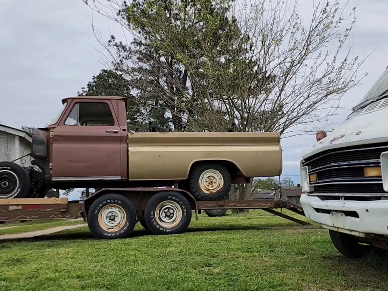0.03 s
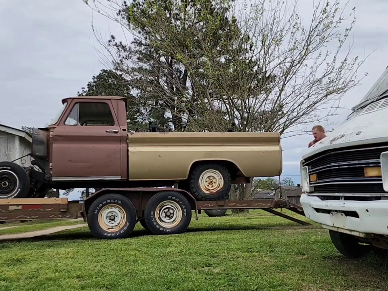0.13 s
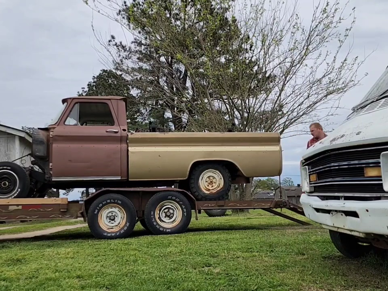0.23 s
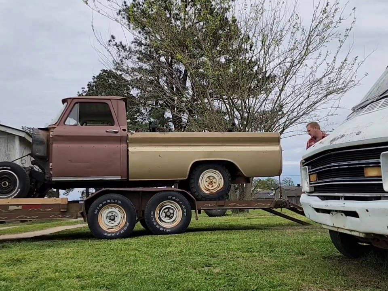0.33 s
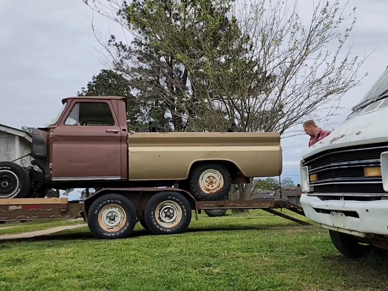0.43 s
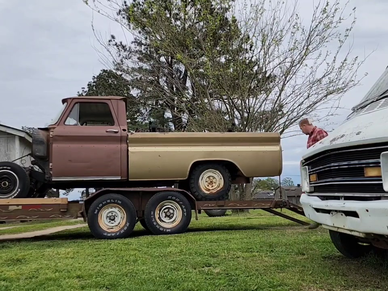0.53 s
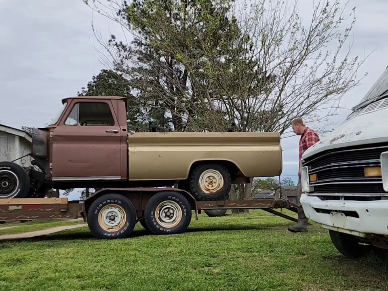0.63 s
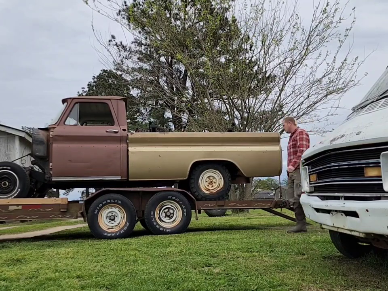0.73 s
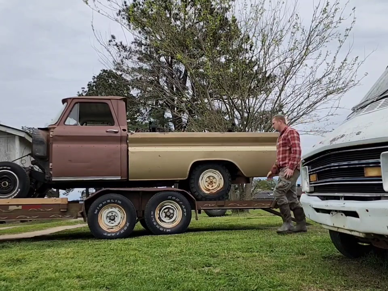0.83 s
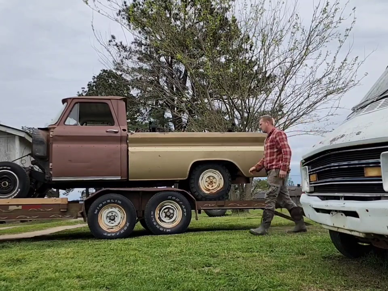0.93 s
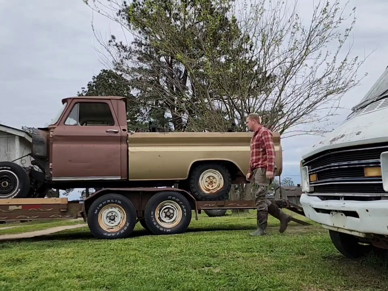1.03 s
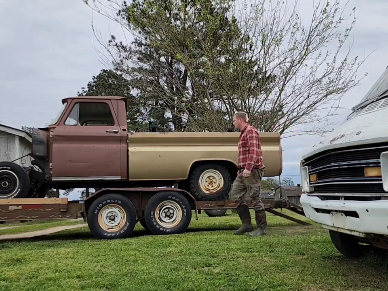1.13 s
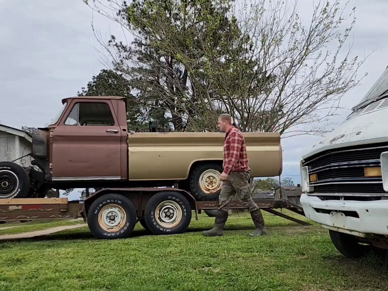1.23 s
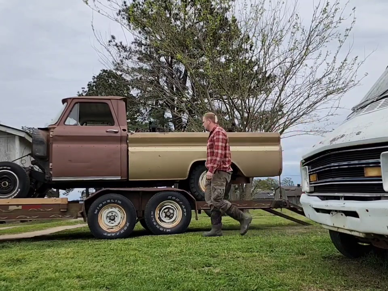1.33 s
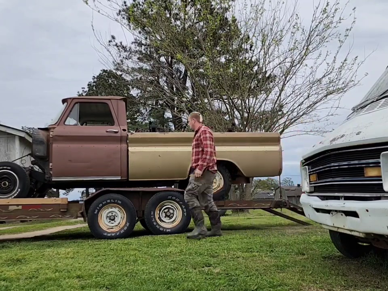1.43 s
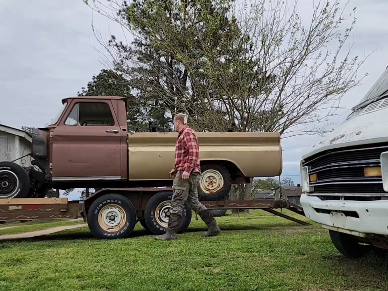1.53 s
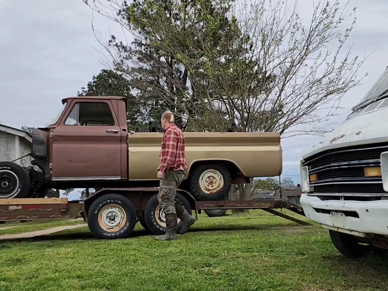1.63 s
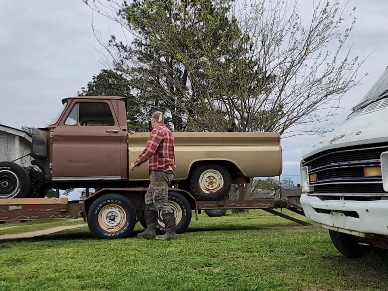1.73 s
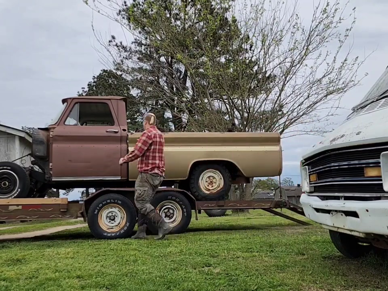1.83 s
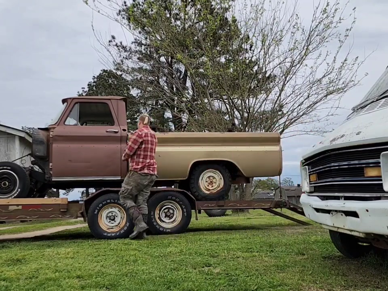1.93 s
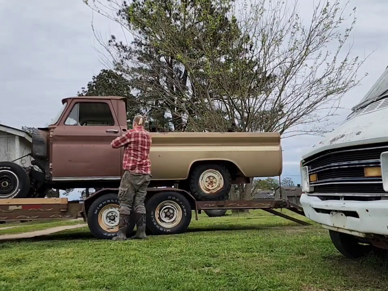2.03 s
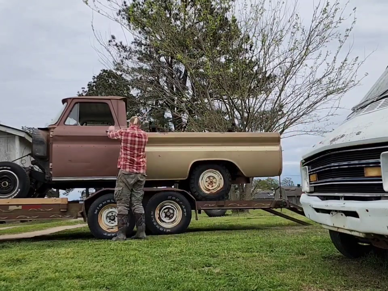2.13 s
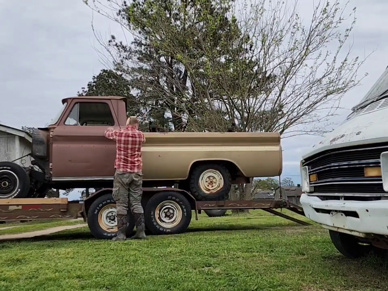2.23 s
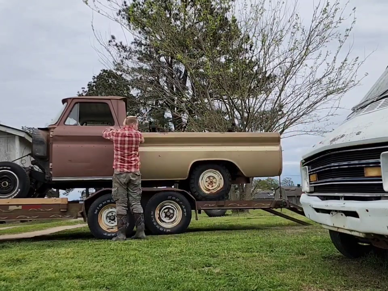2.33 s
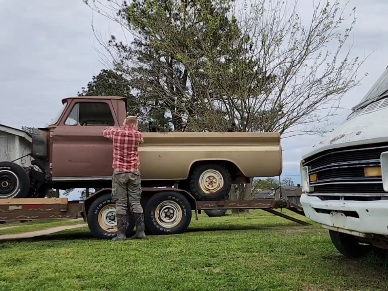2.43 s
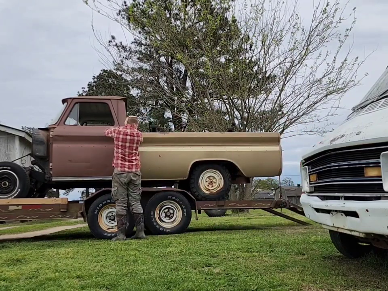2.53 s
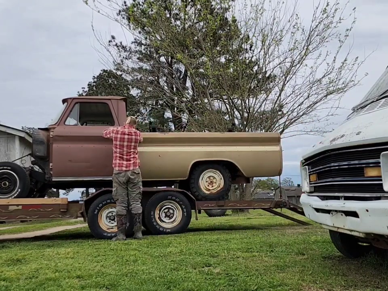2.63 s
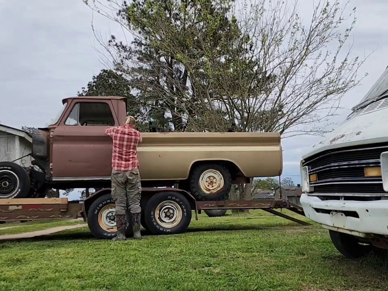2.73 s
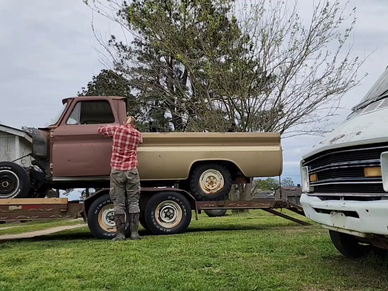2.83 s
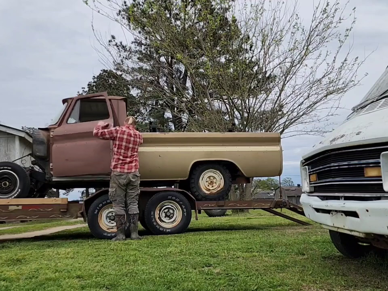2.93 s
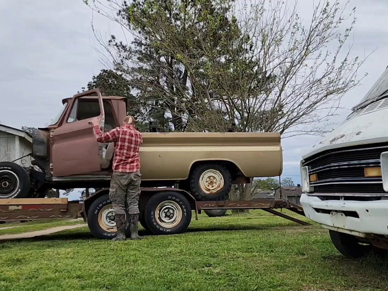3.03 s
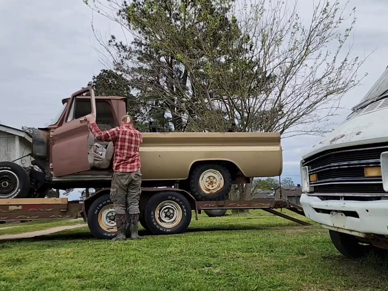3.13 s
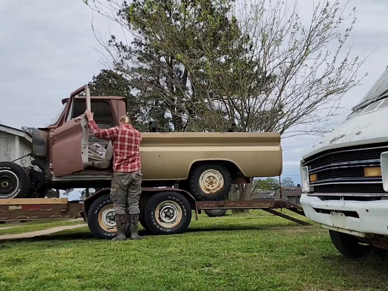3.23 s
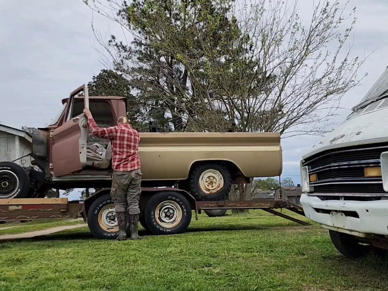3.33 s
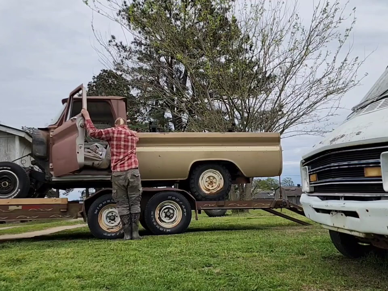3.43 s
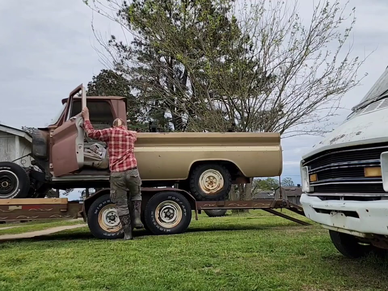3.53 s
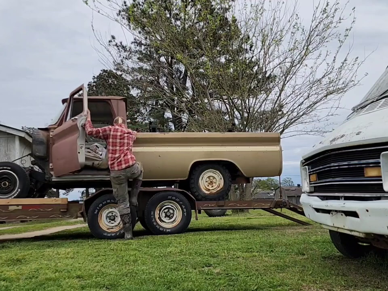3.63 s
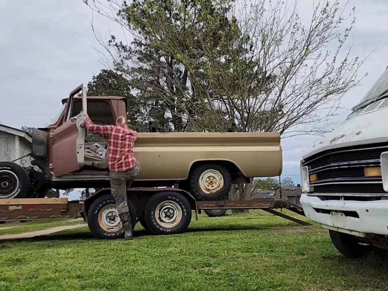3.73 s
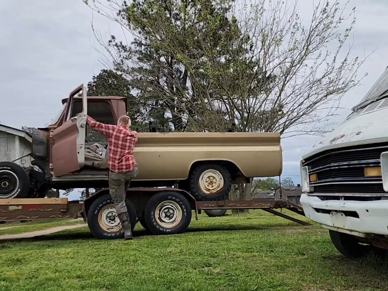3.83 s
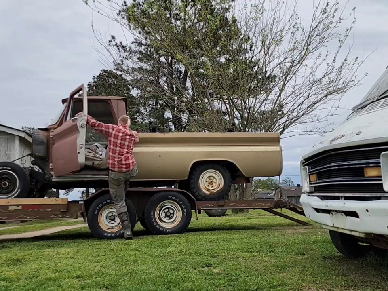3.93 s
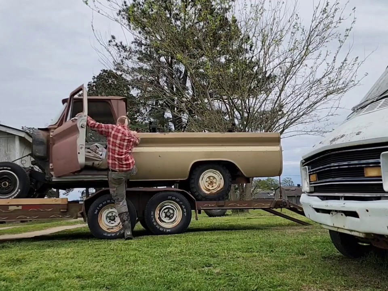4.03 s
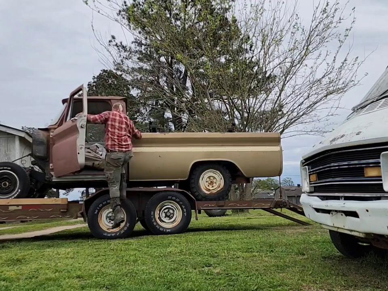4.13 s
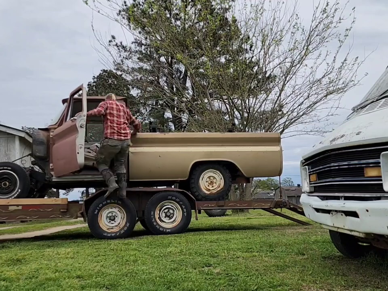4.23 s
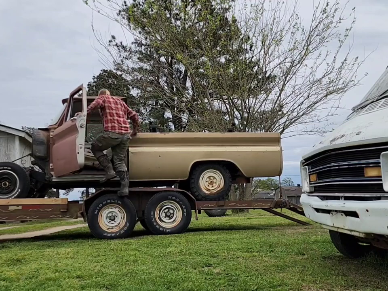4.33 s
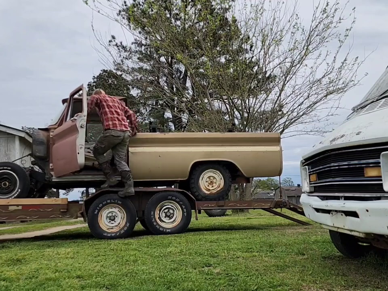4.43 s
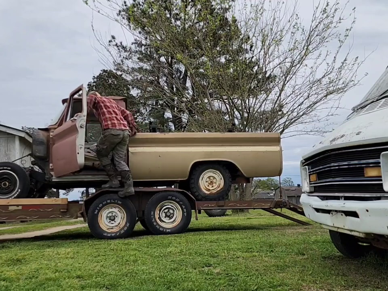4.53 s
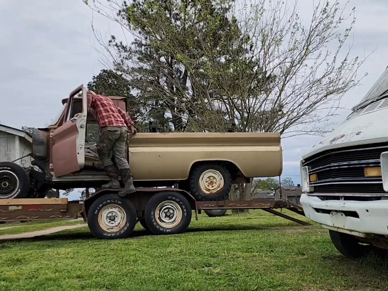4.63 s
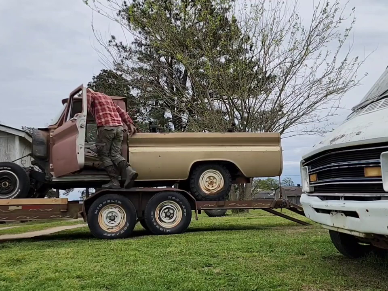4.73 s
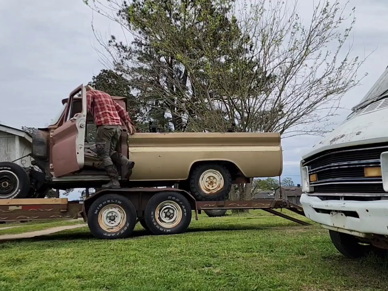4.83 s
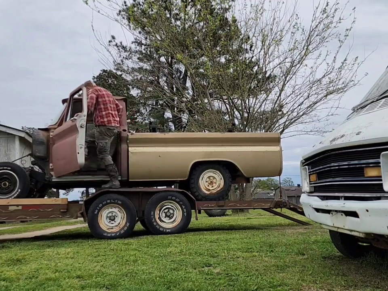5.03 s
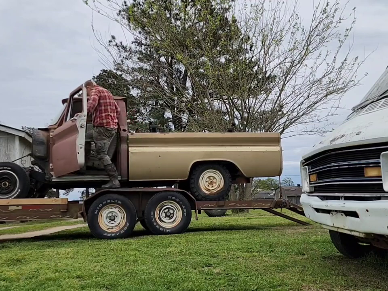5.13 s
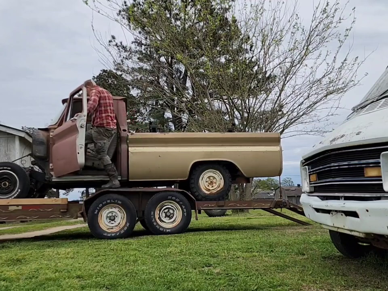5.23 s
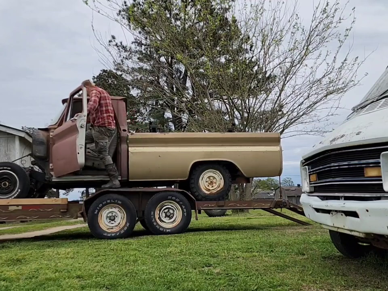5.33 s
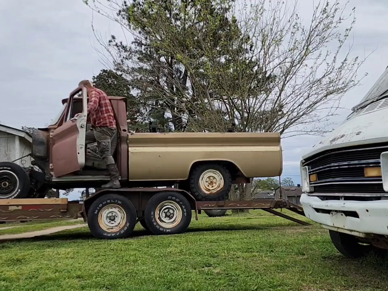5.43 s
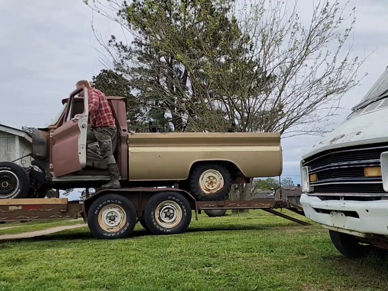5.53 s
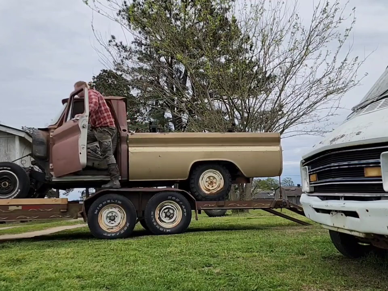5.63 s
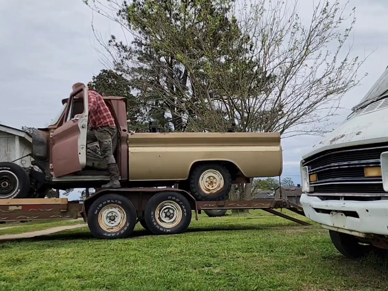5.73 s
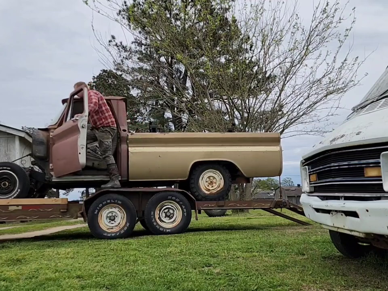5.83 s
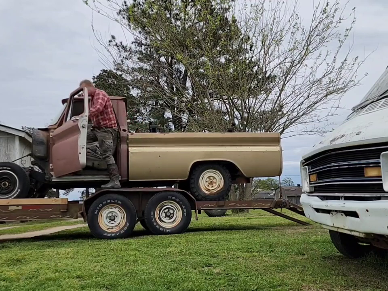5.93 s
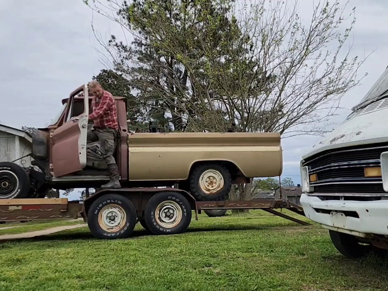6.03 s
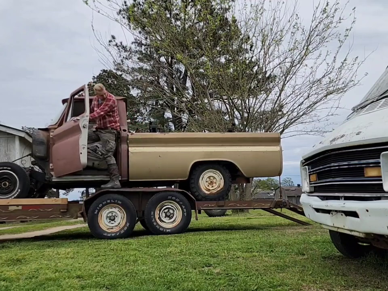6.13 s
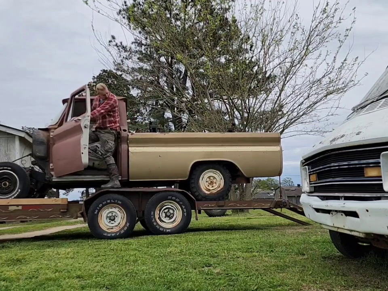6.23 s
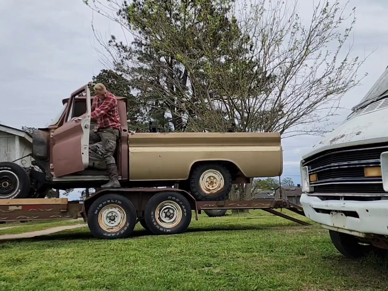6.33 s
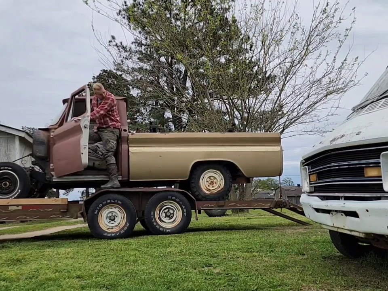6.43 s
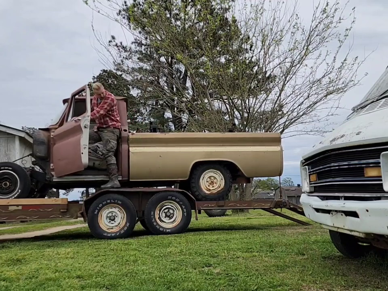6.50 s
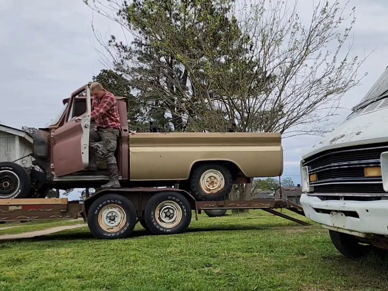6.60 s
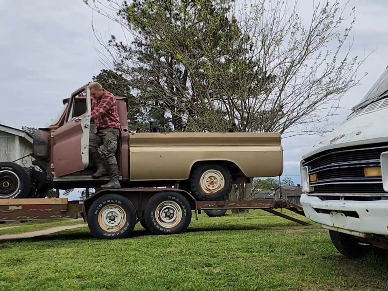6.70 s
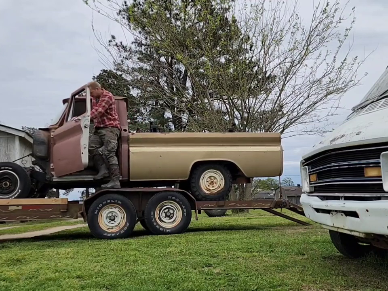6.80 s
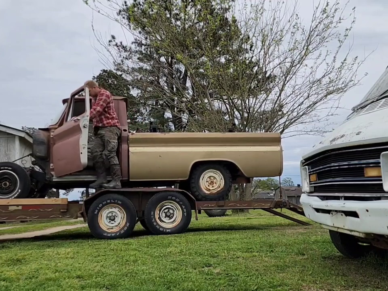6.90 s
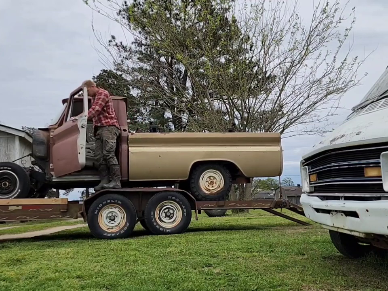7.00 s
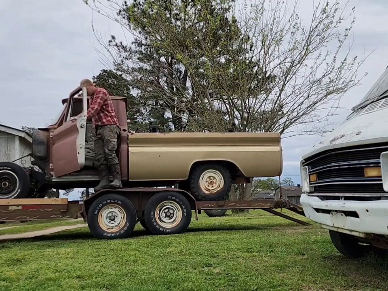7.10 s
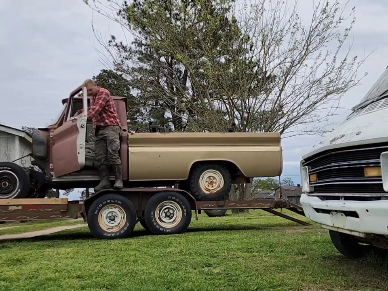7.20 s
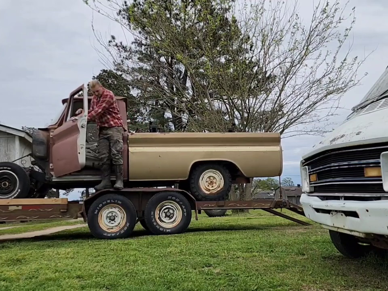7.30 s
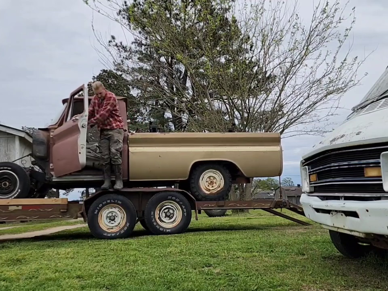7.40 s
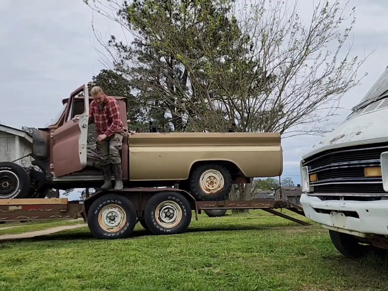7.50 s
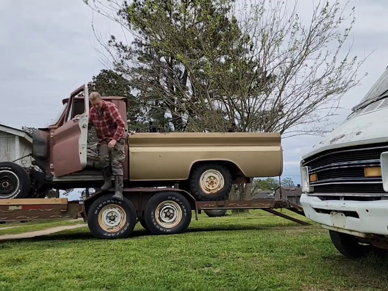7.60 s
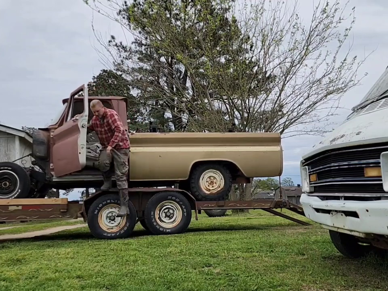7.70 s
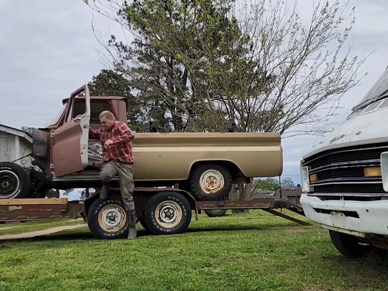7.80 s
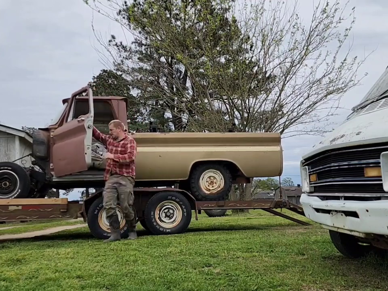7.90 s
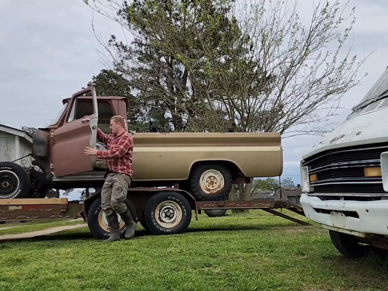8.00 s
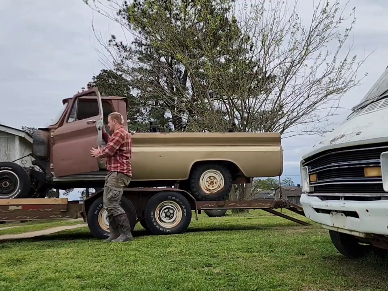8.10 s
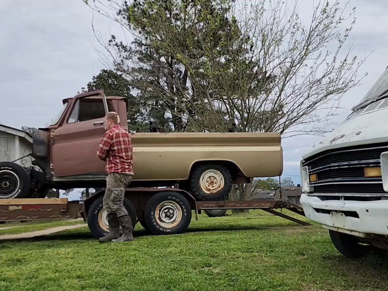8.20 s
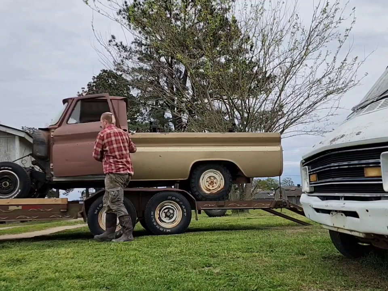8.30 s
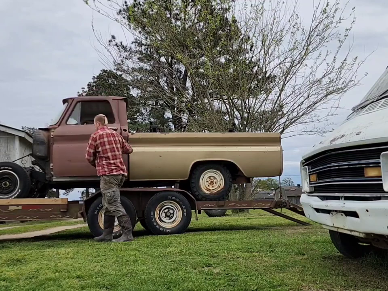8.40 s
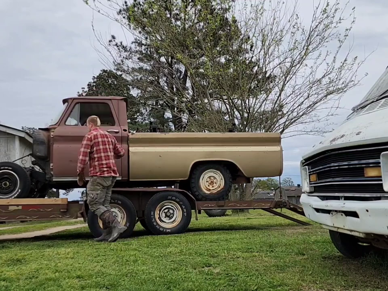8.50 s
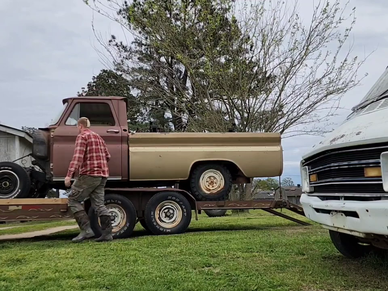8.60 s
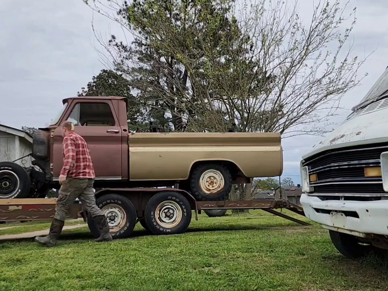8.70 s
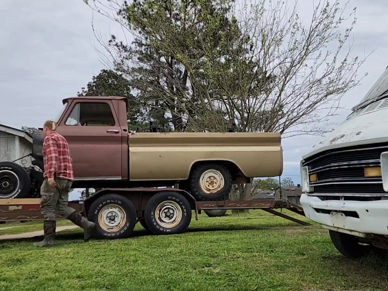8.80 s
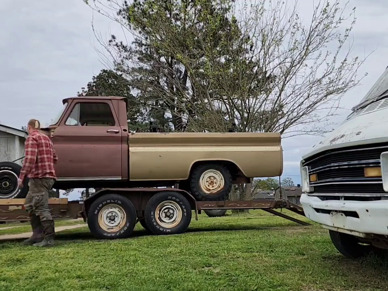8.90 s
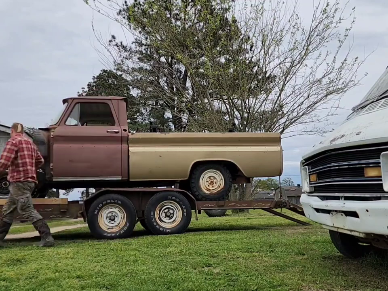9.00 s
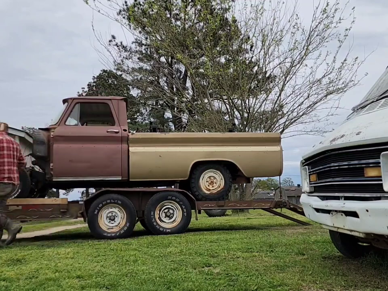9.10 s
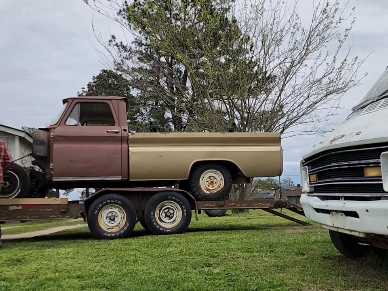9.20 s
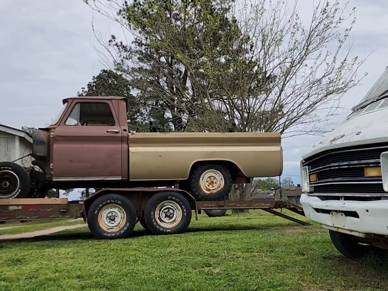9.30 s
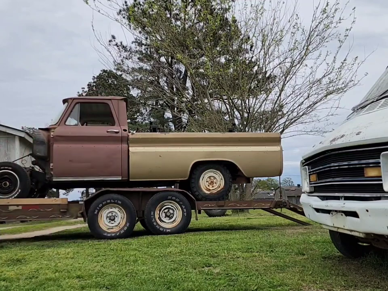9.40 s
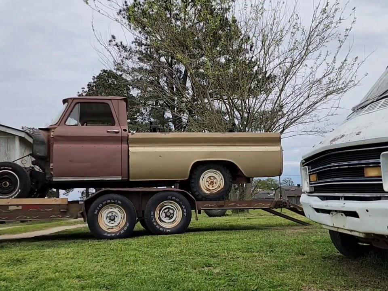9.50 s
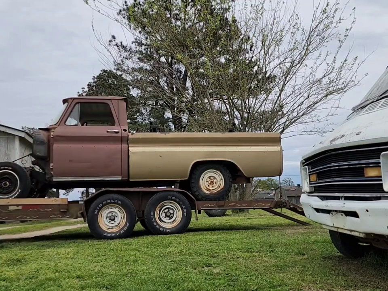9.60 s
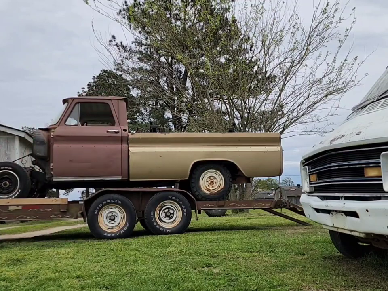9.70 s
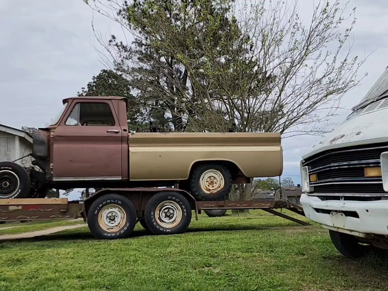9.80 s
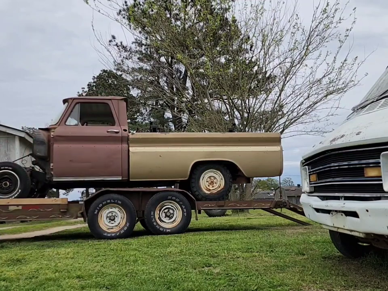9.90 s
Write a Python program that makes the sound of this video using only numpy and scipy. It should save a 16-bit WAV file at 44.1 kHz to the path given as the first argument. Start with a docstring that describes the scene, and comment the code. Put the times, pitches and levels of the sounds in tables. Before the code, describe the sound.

Outdoors, wind rumbles softly on the microphone and a few faint birds chirp. Rubber boots thud across grass to an old steel pickup. A sticking door bangs open with a boom and brief screech. Boots knock on a ringing fender, steel creaks in jerks, gritty soles scrape the sill, then the person steps down and slams the door, the loudest sound. A distant engine hums underneath.

```python
"""Wind brushes the microphone, a few birds call and a man in rubber boots walks over grass to an old steel pickup.
He yanks the sticking door open, climbs by the trailer's fender, scuffs about on the sill, steps down and slams it.
A far engine pulls through its gears. Wind, open air, boots and cloth are filtered noise; engine and birds are sines.
Sheet steel is dense decaying noise driven by random contacts; blows and creaks add ringing modes, the door skin booms."""
import sys
import numpy as np
from scipy import signal
from scipy.fft import rfft, irfft
from scipy.io import wavfile
from scipy.ndimage import uniform_filter1d

SR = 44100
rng = np.random.default_rng(int(sys.argv[2]) if len(sys.argv) > 2 else 0)


def pcm_store(signal):
    """Save signal as 16-bit PCM."""
    levels = np.round(np.clip(np.atleast_2d(signal), -1, 1) * 32767)
    wavfile.write(sys.argv[1], SR, levels.astype(np.int16).T)


N = 438794
TIME = np.arange(N) / SR
TAIL = TIME[:SR * 2 // 5]  # 0.4 s, the span of one short event


def from_db(db):
    """Decibels to amplitude gain."""
    return np.exp(np.asarray(db) * (np.log(10) / 20))


def rms_one(x):
    """Scale to rms 1."""
    return x / np.sqrt(np.mean(x ** 2) + 1e-20)


def crest_one(x, size=512):
    """Scale a stereo burst so that its loudest moment (size samples long) has rms 1."""
    power = uniform_filter1d(np.mean(x ** 2, axis=0), size)
    return x / np.sqrt(power.max() + 1e-20)


def at_hz(points, hz):
    """Read a table on a log-frequency axis."""
    points_hz, values = np.array(points).T
    return np.interp(np.log(hz), np.log(points_hz), values)


def band(x, low_hz, high_hz, order=3):
    """Causal Butterworth band-pass."""
    edges_hz = [low_hz, min(high_hz, .45 * SR)]
    return signal.sosfilt(signal.butter(order, edges_hz, "band", fs=SR, output="sos"), x + 1e-18)


def add(out, s, x):
    """Mix x into out from time s on."""
    i = max(round(s * SR), 0)
    out[:, i:i + x.shape[-1]] += x[..., :N - i]


def drift(rate_hz):
    """Random wander: unit-spread knots at rate_hz, joined by straight lines."""
    knots = rng.standard_normal(400)
    return np.interp(TIME * rate_hz, np.arange(len(knots)), knots)


def stereo_noise(count=len(TAIL)):
    """White noise, independent left and right."""
    return rng.standard_normal((2, count))


def spread(mid, side, alike):
    """Left and right with correlation alike, from two independent equal noises."""
    alike = np.clip(alike, -1, 1)
    return np.sqrt(1 + alike) * mid + np.sqrt(1 - alike) * side * [[1], [-1]]


def smooth_noise(spectrum, alike):
    """Steady stereo noise of a given colour, rms 1."""
    hz = np.maximum(np.arange(N // 2 + 1) * SR / N, 1)
    mid, side = irfft(rfft(stereo_noise(N)) * from_db(at_hz(spectrum, hz)), N)
    return rms_one(spread(mid, side, alike))


# deep bass between centred (0) and wide (pi): t/s, left-right phase/rad
SWING = [(0, 1.9), (1.52, 1.15), (1.68, 3.6), (1.9, 0.97), (3.3, 1.54), (4.05, 1.35), (4.22, 3.04),
         (4.52, 2.85), (4.66, 1.64), (5.3, 0.25), (5.8, 2.16), (6.9, 1.8), (7.25, 2.8), (7.62, 2.97),
         (7.86, .4), (8.66, .35), (9.08, 3.03), (9.95, 2.6)]


def half_swing(t):
    """Half the phase at times t: the bass leads on the left and lags on the right."""
    return np.interp(t, *np.transpose(SWING)) / 2 * np.array([[1], [-1]])


# open air colour: f/Hz, relative density/dB
AIR = [(15, -32.5), (25, -7), (69, -0.5), (91, -3.5), (164, -11), (322, -28), (421, -30.5), (552, -35),
       (1410, -35.5), (2630, -50.5), (6920, -57), (7500, -50.5), (9050, -62), (15500, -59)]


def open_air(level_db=-52.7):
    """Hush of open country: steady coloured noise, nearly uncorrelated left to right."""
    return from_db(level_db) * smooth_noise(AIR, alike=0.13)


# wind rumble colour ahead of the band-pass: f/Hz, relative density/dB
WIND = [(12, -47.5), (20, -21), (45, -5), (97, 7), (157, -4.5), (192, -11), (304, -30), (352, -20.5),
        (500, -20.5), (650, -50), (1100, -120)]
# gusts ahead of trim and lumps: t/s, level/dB
GUSTS = [(0, -55.5), (.45, -50), (.8, -59.5), (1.05, -52), (1.7, -55), (2.05, -48), (2.7, -51), (3.2, -45),
         (4.0, -43.5), (4.3, -48), (5.5, -47.5), (6.5, -45), (8.1, -50), (8.9, -45), (9.95, -50)]


def wind(trim_db=2, lumps_db=4, lumps_hz=21):
    """Wind on the microphone: lumpy low noise whose stereo width swings."""
    mid, side = rms_one(band(smooth_noise(WIND, alike=0), 12, 340))
    rumble = np.cos(half_swing(TIME)) * mid + np.sin(half_swing(TIME)) * side
    gust_db = np.interp(TIME, *np.transpose(GUSTS))
    return rumble * from_db(gust_db + trim_db + lumps_db * drift(lumps_hz))


# engine pulls: t/s, length/s, start f/Hz, end f/Hz, mid-pull level/dB ahead of trim
PULLS = [(3.08, 1.6, 73.1, 113.1, -39.5), (4.25, 0.64, 172.3, 192.7, -49), (4.58, 1.02, 65.5, 86, -34),
         (5.55, 1.22, 100, 105, -38.5), (6.6, 2.9, 65.56, 81.5, -31), (6.98, .66, 182.8, 191.6, -48),
         (9.1, .45, 189.7, 185.6, -56), (9.42, 0.59, 105, 99.15, -44)]


def far_engine(trim_db=-1, second_db=-24, ends_db=-7.5, fade_s=0.049, waver_db=1.5, waver_hz=.8):
    """Firing note and weak second harmonic; each pull glides evenly, wavers, swells and falls away."""
    out = np.zeros((2, N))
    for s, length_s, start_hz, end_hz, db in PULLS:
        t = TIME[TIME < length_s]
        along = t / length_s
        hz = start_hz + (end_hz - start_hz) * along + waver_hz * drift(12)[:len(t)]
        turn = 2 * np.pi * np.cumsum(hz) / SR
        turn = turn + half_swing(s + t) * (start_hz < 150)  # only the deep pulls swing in width
        note = np.sqrt(2) * (np.sin(turn) + from_db(second_db) * np.sin(2 * turn))
        fade = np.minimum(np.minimum(t, length_s - t) / fade_s, 1)
        swell_db = ends_db * (2 * along - 1) ** 2 + waver_db * drift(21)[:len(t)]
        add(out, s, fade * note * from_db(db + trim_db + swell_db))
    return out


# held whistles: t/s, length/s, f/Hz, peak amplitude/dB
THIN_WHISTLES = [(9.28, .4, 9970, -87), (9.46, 0.26, 8100, -81.5), (9.55, 0.18, 5350, -81)]


def thin_whistles(warble=.008):
    """A small bird holds high, slightly trembling sine notes."""
    out = np.zeros((2, N))
    for s, length_s, hz, db in THIN_WHISTLES:
        trembling_hz = hz * (1 + warble * drift(200)[:len(TAIL)])
        turn = 2 * np.pi * np.cumsum(trembling_hz) / SR
        swell = np.sin(np.pi * np.minimum(TAIL / length_s, 1))
        add(out, s, from_db(db) * swell * np.sin(turn))
    return out


# calls: t/s, first note's start f/Hz, first note's level/dB
BIRD_CALLS = [(.275, 2650, -72.5), (.485, 3130, -66), (.76, 2424, -67), (.99, 3160, -73.5),
              (1.01, 1760, -72), (1.08, 2580, -73.5), (2.785, 3300, -71), (3.281, 3300, -68),
              (3.551, 2990, -68), (9.48, 3050, -73.5), (9.73, 3040, -69)]


def bird_calls(warble=.05, length_s=0.051, fall=0.11, echo_s=0.032, echo_gain=0.08):
    """Pairs of thin falling whistles, blurred by echoes from the trees."""
    second_s, second_drop, second_db = .078, 0.092, -3.5  # delay, fraction lower, softer
    out, along = np.zeros((2, N)), np.minimum(TAIL / length_s, 1)
    for s, start_hz, db in BIRD_CALLS:
        for k in range(2):
            glide = 1 - fall * rng.uniform(.7, 1.3) * along
            hz = start_hz * (1 - k * second_drop) * glide * (1 + warble * drift(160)[:len(TAIL)])
            note = np.sin(np.pi * along) * np.sin(2 * np.pi * np.cumsum(hz) / SR)
            trees = stereo_noise() * np.exp(-TAIL / echo_s) * echo_gain
            trees[:, 0] = 1  # direct sound
            call = signal.fftconvolve(trees, note[None], axes=1)
            add(out, s + k * second_s, from_db(db + k * second_db) * crest_one(call))
    return out


# rustles: middle t/s, level/dB ahead of trim
RUSTLES = [(.85, -74), (1.11, -75), (1.70, -69), (1.978, -72), (2.19, -69), (2.829, -70.5), (3.253, -66),
           (3.382, -68), (3.44, -62.5), (4.159, -64.5), (4.326, -64.5), (4.56, -63), (5.118, -69)]


def clothes(trim_db=-5, length_s=.09):
    """Shirt and trousers rustle: short swells of treble noise."""
    out = np.zeros((2, N))
    swell = np.sin(np.pi * np.minimum(TAIL / length_s, 1)) ** 2
    for s, db in RUSTLES:
        cloth = band(stereo_noise(), 3400, 6100, order=1)
        add(out, s - length_s / 2, from_db(db + trim_db) * crest_one(cloth * swell))
    return out


def twig(s=.423, db=-55, decay_s=0.004):
    """A twig snaps underfoot: one sharply decaying noise burst."""
    out = np.zeros((2, N))
    snap = band(stereo_noise() * np.exp(-TAIL / decay_s), 700, 5000, order=2)
    add(out, s, from_db(db) * crest_one(snap))
    return out


# steps, levels ahead of trim: heel t/s, thud level/dB, swish level/dB, boot f/Hz, heel-to-sole/s
STEPS = [(0.275, -48.5, -77, 330, .058), (0.415, -49, -76, 300, .062), (0.789, -48.5, -86, 500, .092),
         (1.412, -48, -75, 440, 0.071), (1.822, -43, -92, 430, .035), (2.175, -50, -72, 400, .058),
         (7.956, -44.5, -77, 420, .07), (8.439, -49.5, -90.5, 422, .07), (9.174, -60.5, -82, 400, 0.068),
         (9.707, -61.5, -70, 400, 0.063)]


def footsteps(thud_trim_db=-4, swish_trim_db=-1, sole_db=-1.5, decay_s=0.022, rise_s=0.007):
    """A hollow rubber boot thuds and the grass swishes, for the heel and then, softer, for the sole."""
    out = np.zeros((2, N))
    hit = (1 - np.exp(-TAIL / rise_s)) * np.exp(-TAIL / decay_s)
    for heel_s, thud_db, swish_db, boot_hz, roll_s in STEPS:
        for s, db in ((heel_s, 0), (heel_s + roll_s, sole_db)):
            boot = band(stereo_noise() * hit, boot_hz / 1.45, boot_hz * 1.253, order=2)
            grass = band(stereo_noise() * hit, 1000, 6000, order=1)
            add(out, s - rise_s, from_db(thud_db + thud_trim_db + db) * crest_one(boot))
            add(out, s - rise_s / 2, from_db(swish_db + swish_trim_db + db) * crest_one(grass))
    return out


def sole_squeak(s=4.610, hz=2160, width_hz=560, db=-48.5, length_s=0.011):
    """Rubber catches once on bare metal: a brief narrow noise band."""
    grip = np.exp(-((TIME - s) / length_s) ** 2)
    squeak = band(stereo_noise(N), hz - width_hz / 2, hz + width_hz / 2, order=2)
    return from_db(db) * crest_one(grip * squeak)


# sheet steel colour: f/Hz, relative density/dB
STEEL = [(40, -2), (100, 11.5), (200, 4), (400, 4), (600, -5.5), (1000, -2.5), (1600, 0.5), (2300, -9),
         (5000, -7.5), (7500, -13), (10500, -26.5), (15000, -21.5)]
# left-right likeness of the truck's steel: f/Hz, correlation
LIKENESS = [(60, 0.47), (130, 0.11), (290, 0.47), (640, .3), (1400, .16), (2600, -0.15), (6800, 0),
            (15000, -0.29)]


def sheet_steel():
    """Dense modes of sheet steel as bands just under half an octave: a list of (Hz, stereo noise)."""
    edges_hz = 20 * 2 ** np.arange(0, 9.9, .49)
    white, bands = rng.standard_normal((2, 2, N)), []
    for k, (low_hz, high_hz) in enumerate(zip(edges_hz, edges_hz[1:])):
        hz = np.sqrt(low_hz * high_hz)
        mid, side = band(white[k % 2], low_hz, high_hz, order=2) * from_db(at_hz(STEEL, hz))
        bands.append((hz, spread(mid, side, at_hz(LIKENESS, hz))))
    return bands


# tail decay: f/Hz, t60/s
STEEL_T60 = [(60, 0.98), (170, .7), (350, .42), (700, .32), (1400, 0.27), (4000, .21), (12000, .17)]


def panel(steel, tail_db, crack_share=0.33):
    """One touch on sheet steel: a crack and a tail, dying band by band; the crack takes crack_share of t60."""
    i, dense = rng.integers(SR, N - SR), 0
    for hz, noise in steel:
        fall_db = -60 * TAIL / at_hz(STEEL_T60, hz)
        decay = from_db(fall_db / crack_share) + from_db(fall_db + tail_db)
        dense = dense + noise[:, i:i + len(TAIL)] * decay
    return dense


def slips(per_s, spread_db):
    """Random little contacts of uneven size and sign."""
    count = len(TAIL)
    size = np.minimum(rng.exponential(1, count), 4)
    sign = rng.choice([-1, 1], count)
    return (rng.random(count) < per_s / SR) * from_db(spread_db * size) * sign


def drive(steel, force, tail_db):
    """Sheet steel answering a contact force."""
    return signal.fftconvolve(panel(steel, tail_db), force[None], axes=1)[:, :len(TAIL)]


def ringing(modes, uneven_db=1.5):
    """A part's own modes, uneven from strike to strike and from side to side."""
    rings = 0
    for hz, db, t60_s in modes:
        turn = 2 * np.pi * (hz * TAIL + rng.random()) + rng.normal(0, 0.64, (2, 1))
        mode_db = db + rng.normal(0, uneven_db) - 60 * TAIL / t60_s
        rings = rings + from_db(mode_db) * np.sin(turn)
    return rings


# bass, low mids, high mids, treble: low f/Hz, high f/Hz
REGISTERS = [(40, 250), (250, 800), (800, 2500), (2500, 15500)]


def add_registers(out, s, sound, registers, levels_db):
    """Mix sound in at time s, each register set to its own level."""
    for (low_hz, high_hz), db in zip(registers, levels_db):
        add(out, s, from_db(db) * crest_one(band(sound, low_hz, high_hz)))


def blows(rows, steel, modes, modes_db, tail_db, press_s, register_db):
    """Rattles of contacts; weight lifts bass and, half as much, low mids; hardness sets treble."""
    out, press = np.zeros((2, N)), TAIL / press_s
    for s, strength_db, weight_db, hardness_db in rows:
        force = slips(per_s=2200, spread_db=3.0) * press ** 2 * np.exp(-press)
        dense = drive(steel, force, tail_db)
        rings = ringing(modes) * (1 - np.exp(-press / 2)) ** 2
        sound = rms_one(dense) + from_db(modes_db) * rms_one(rings)
        lifts_db = np.array([weight_db, weight_db / 2, 0, hardness_db])
        levels_db = strength_db + lifts_db + register_db
        add_registers(out, s - 2 * press_s, sound, REGISTERS, levels_db)  # force peaks at s
    return out


# scrapes on rusty steel, door edge first, then gritty soles on the sill, ahead of register trim:
# middle t/s, strength/dB, weight/dB, hardness/dB, length/s
SCRAPES = [(2.575, -50, 0, -22, .06), (4.8, -53, 4, -12.5, .11), (4.918, -42, -2, -8, .11),
           (5.72, -55.5, -15, -3.5, .11), (5.987, -53, 2, -4.5, 0.085), (6.147, -45, -1, -1, .13),
           (6.643, -54.5, -4, -29.5, 0.098), (6.952, -52.5, -.5, -17, .1), (7.06, -47, -6, -7, .078),
           (7.271, -49.5, -0.5, -8.5, 0.077), (7.595, -40, -2, -7.5, 0.094), (7.795, -42, -2, -13.5, .11),
           (8.236, -61, 9, -5, .2)]


def scrapes(steel, register_db=(-3, -9, -2)):
    """The door edge, then gritty soles on the sill, stick and slip in swelling strokes; no bass register."""
    out = np.zeros((2, N))
    for s, strength_db, weight_db, hardness_db, length_s in SCRAPES:
        stroke = np.sin(np.pi * np.minimum(TAIL / length_s, 1))
        sound = drive(steel, slips(per_s=900, spread_db=3) * stroke, tail_db=-21.5)
        levels_db = strength_db + np.array([weight_db, 0, hardness_db]) + register_db
        add_registers(out, s - length_s / 2, sound, REGISTERS[1:], levels_db)
    return out


# knocks on the cab, ahead of register trim: t/s, strength/dB, weight/dB, hardness/dB
CAB_BLOWS = [(4.773, -53, 6.5, -8.5), (4.874, -43.5, -1, -10), (4.993, -52, -0.5, -7), (7.02, -56, 7, -28),
             (7.168, -54, 8, 1), (7.614, -49.5, 8, -19), (7.749, -45, -2.5, -10), (8.008, -46, 3, -10.5),
             (8.046, -53, 15.5, -24), (8.104, -52.5, 4, -7.5), (8.31, -55.5, 14, -11.5)]
# cab ringing: f/Hz, relative level/dB, t60/s
CAB_MODES = [(162.6, 0, .22), (345, 1.5, .17), (400, -1, .12), (462, -3, 0.21), (637, -6, .1),
             (1535, -7, 0.099), (1890, -7, .08)]


def cab_knocks(steel):
    """Knocks on the cab: short ringing, little steel tail."""
    return blows(CAB_BLOWS, steel, CAB_MODES, modes_db=-4.0, tail_db=-17, press_s=.004,
                 register_db=(0, 3, -5.5, 0.5))


# boots and hands on fender and sill, ahead of register trim: t/s, strength/dB, weight/dB, hardness/dB
FENDER_BLOWS = [(3.932, -27.5, 0, -22.5), (3.989, -47.5, 11.5, -10.5), (4.079, -51.5, 11, -10.5),
                (4.27, -55, -7, -24), (4.655, -51, 16, -22.5)]
# fender ringing: f/Hz, relative level/dB, t60/s
FENDER_MODES = [(121.6, 0, 0.46), (239.3, -3.5, 0.5), (378, 2, 0.32), (399.2, 1.5, 0.34), (673, -5, 0.24),
                (1134, -12, 0.18), (1425, -8, 0.3), (1540, -2, 0.13), (2040, -16, .24)]


def fender_knocks(steel):
    """Boots and hands on fender and sill: softer contact, long low ringing."""
    return blows(FENDER_BLOWS, steel, FENDER_MODES, modes_db=-1.5, tail_db=1, press_s=0.0055,
                 register_db=(0, -1, -7.5, 4))


# jerks under his weight, ahead of register trim: t/s, strength/dB
CREAKS = [(5.281, -34), (5.314, -34), (5.338, -29.5), (5.357, -33), (5.397, -31.5), (5.409, -34),
          (5.434, -32), (5.468, -36), (5.552, -48), (5.618, -53.5), (5.678, -46.5)]
# strained steel ringing: f/Hz, relative level/dB, t60/s
CREAK_MODES = [(163.2, -0.5, 0.26), (340, -4, 0.18), (463.5, -1, 0.13), (1051, 0.5, 0.1), (1407, -6, 0.14),
               (1580, -5, 0.082), (1830, -6.5, 0.084), (5420, -6, 0.085), (7580, -7.5, 0.083)]


def creaks(steel, weight_db=-2, hardest_db=-14.5, dulling=0.78):
    """Door and cab creak in jerks: weaker slips lose treble, by dulling dB per dB."""
    strongest_db = max(db for s, db in CREAKS)
    jerks = [(s, db, weight_db, hardest_db + dulling * (db - strongest_db)) for s, db in CREAKS]
    return blows(jerks, steel, CREAK_MODES, modes_db=-6, tail_db=-10.5, press_s=.003,
                 register_db=(-0.5, -4.5, -6, -1.5))


def door_rattle(steel, s=8.815, shake_hz=11.9, t60_s=0.72, length_s=0.18,
                register_db=(-37, -44.5, -48, -60)):
    """The shut door shakes against its latch, rattling once on each swing as it settles."""
    swing = np.sin(np.pi * shake_hz * TAIL) ** 2
    shake = swing * from_db(-60 * TAIL / t60_s) * (TAIL < length_s)
    sound = drive(steel, slips(per_s=1600, spread_db=2.5) * shake, tail_db=-13)
    out = np.zeros((2, N))
    add_registers(out, s, sound, REGISTERS, register_db)
    return out


# screech bands: f/Hz, width/Hz, relative level/dB
SCREECH = [(4670, 460, -2), (5330, 203, -3), (5577, 76.3, -0.5), (6340, 41, -0.5)]


def door_screech(s=3.004, length_s=0.019, db=-24, lead_s=.1):
    """The door edge screeches out of its frame: narrow noise bands under one brief swell."""
    out, rub, screech = np.zeros((2, N)), stereo_noise(), 0
    for hz, width_hz, band_db in SCREECH:
        narrow = band(rub, hz - width_hz / 2, hz + width_hz / 2, order=1)
        screech = screech + from_db(band_db) * rms_one(narrow)
    grip = np.exp(-((TAIL - lead_s) / length_s) ** 2)
    add(out, s - lead_s, from_db(db) * crest_one(screech * grip))
    return out


# door skin flexing: t/s, f/Hz, level/dB, swell/s, t60/s
BOOMS = [(2.982, 109, 6, .016, .17), (2.975, 43, -16.5, 0.0062, 0.27), (8.683, 104, -1.5, .005, .11),
         (8.685, 152, -8, 0.0024, 0.11), (8.684, 62, -21, .005, .3), (8.835, 104, -26, 0.0093, 0.27)]


def door_skin():
    """The big panel booms as it springs free or slams: decaying low sines."""
    out = np.zeros((2, N))
    for s, hz, db, swell_s, t60_s in BOOMS:
        swell = 1 - np.exp(-TAIL / swell_s)
        decay = from_db(db - 60 * TAIL / t60_s)
        add(out, s, -decay * swell * np.sin(2 * np.pi * hz * TAIL))
    return out


# blows on the door, ahead of register trim: t/s, strength/dB, weight/dB, hardness/dB
DOOR_BLOWS = [(2.572, -49, -1, -11), (2.613, -36, -.5, -10), (2.971, -20, -5, -12), (2.992, -17, -5, -7),
              (3.08, -28, -4, -8), (8.683, -13.5, -5.5, -11.5), (8.691, -8, -8, -6.5),
              (8.734, -25.5, -7, -15.5)]
# door ringing: f/Hz, relative level/dB, t60/s
DOOR_MODES = [(233, -4, .18), (371, -0.5, 0.18), (589, -0.5, 0.17), (862, -3, .2), (931, -5, .12),
              (1069, -5.5, .18), (1309, -1, .13), (1410, -2, .13), (1550, -1.5, .13), (1735, -3, 0.14),
              (2130, -10, .12), (2564, -10, .11), (2900, -11.5, .12), (5640, -13, 0.087)]


def door_blows(steel):
    """Yank and slam: quick hard contact on steel with many midrange modes."""
    return blows(DOOR_BLOWS, steel, DOOR_MODES, modes_db=-8, tail_db=-10, press_s=.0028,
                 register_db=(0.5, -5.5, -7, -4))


def scene():
    """The open air, the man and the truck."""
    steel = sheet_steel()
    background = open_air() + wind() + far_engine() + thin_whistles() + bird_calls()
    man = clothes() + twig() + footsteps() + sole_squeak()
    truck = scrapes(steel) + cab_knocks(steel) + fender_knocks(steel) + creaks(steel)
    door = door_rattle(steel) + door_screech() + door_skin() + door_blows(steel)
    return background + man + truck + door


def record(dry, top=0.89, cutoff_hz=15900):
    """Peaks are rounded by tanh, then the top is cut by a steep low-pass."""
    rounded = top * np.tanh(dry / top)
    return signal.sosfilt(signal.ellip(10, .1, 80, cutoff_hz, fs=SR, output="sos"), rounded)


dry = scene()
out = record(dry)
pcm_store(out)
```